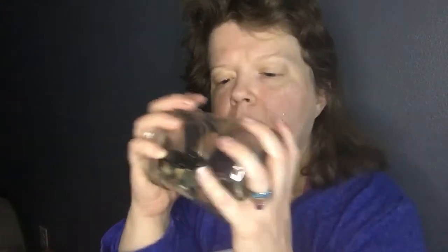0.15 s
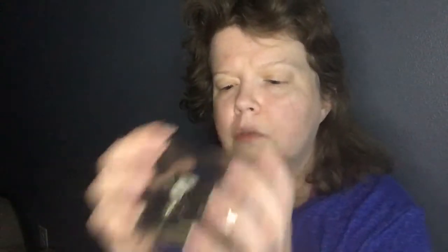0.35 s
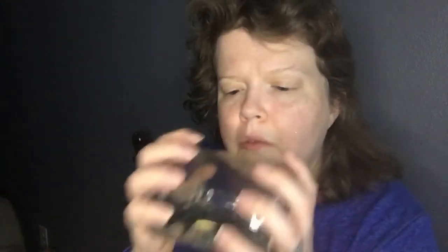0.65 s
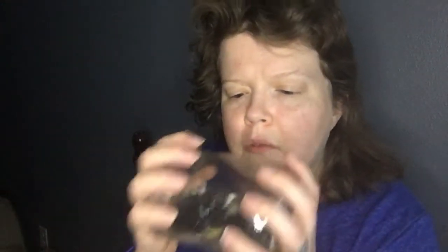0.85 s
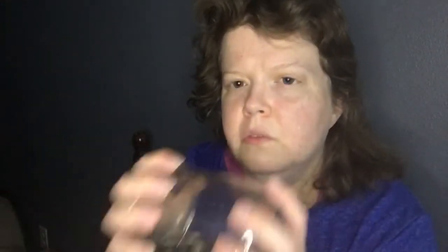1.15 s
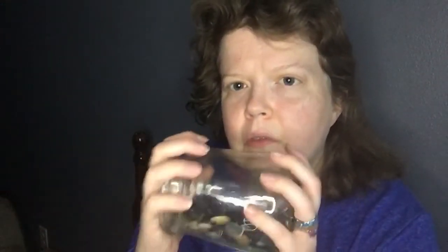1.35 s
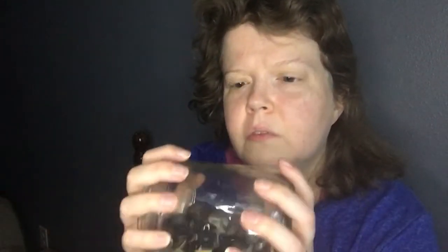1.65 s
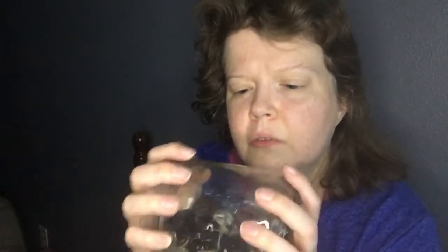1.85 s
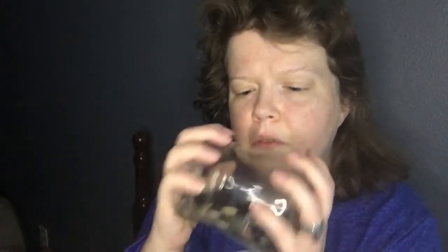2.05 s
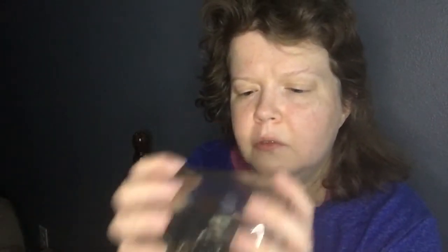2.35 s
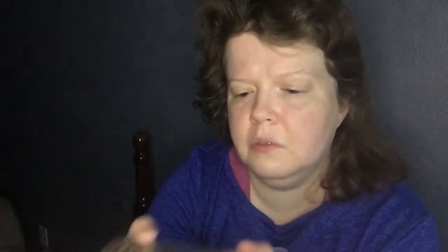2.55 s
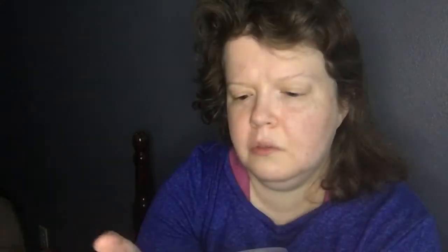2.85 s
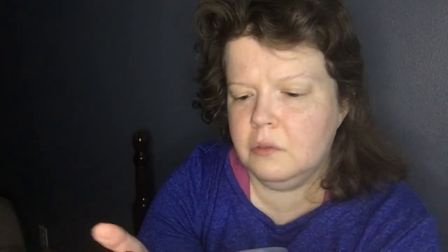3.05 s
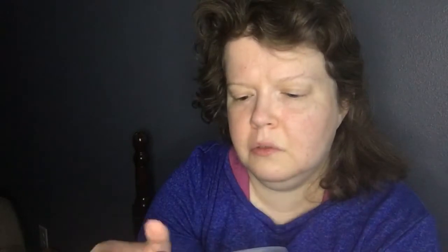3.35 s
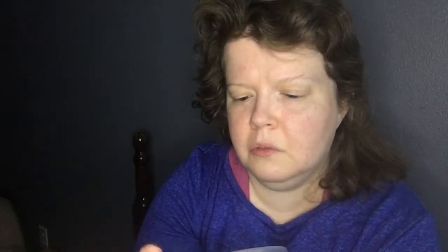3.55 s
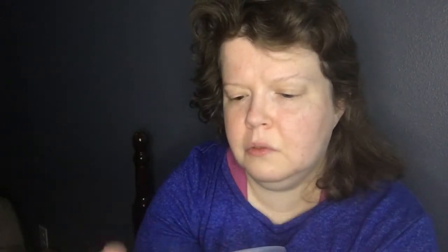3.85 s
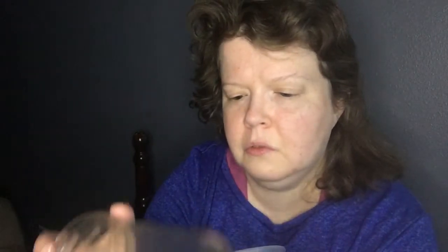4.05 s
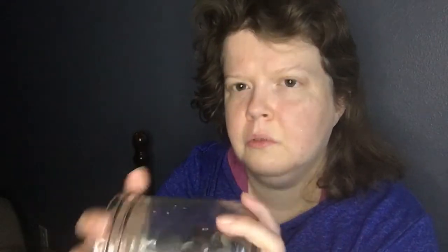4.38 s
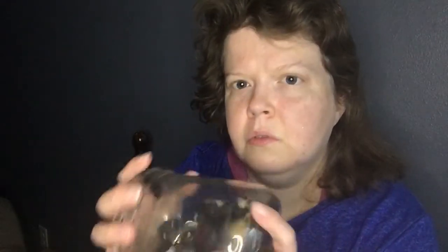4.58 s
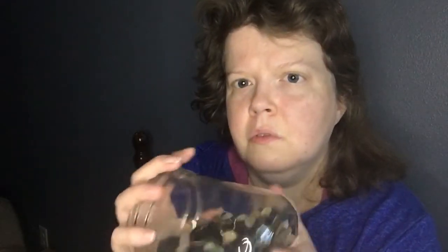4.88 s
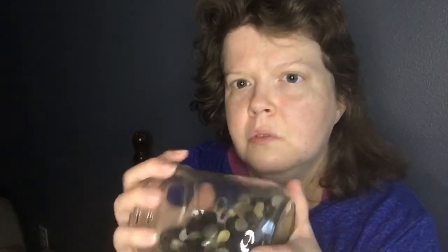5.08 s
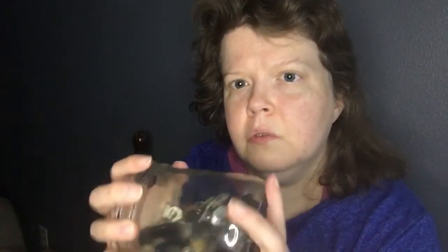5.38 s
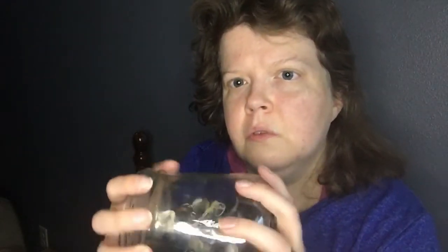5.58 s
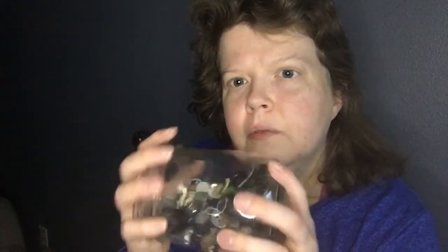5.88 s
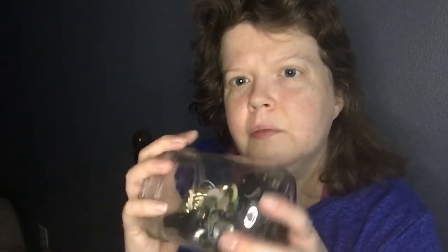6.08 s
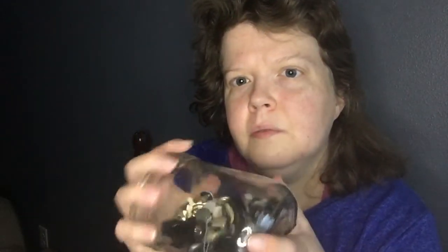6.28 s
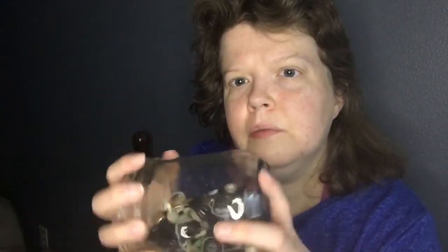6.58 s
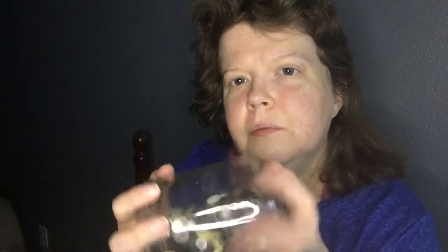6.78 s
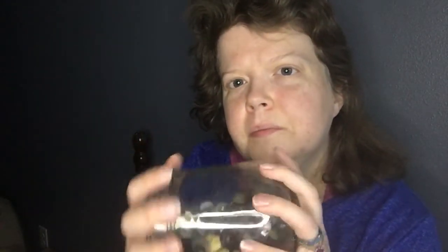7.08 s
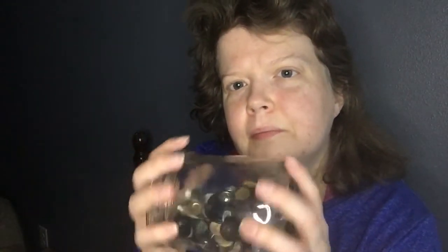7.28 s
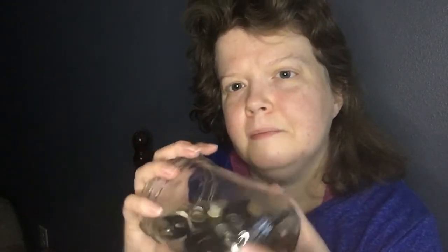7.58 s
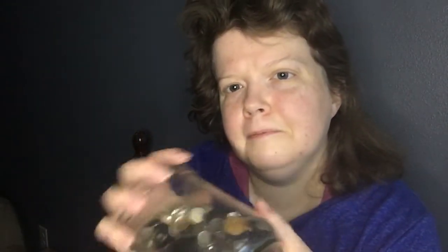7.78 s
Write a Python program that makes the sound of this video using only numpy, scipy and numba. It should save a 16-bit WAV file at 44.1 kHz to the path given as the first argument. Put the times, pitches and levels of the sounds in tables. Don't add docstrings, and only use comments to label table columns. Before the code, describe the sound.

Close to the microphone, two hands shake a glass jar of loose buttons. Dense bright knocks and rattles crowd the first second and a half, thin out, then return in a short burst. Sparse airy shifts follow, then a sharp new tumble and uneven rolling clinks to the end. A small furnished room and faint hum sit behind.

```python
import sys
import numpy as np
from scipy import signal
from scipy.fft import rfft, irfft
from scipy.io import wavfile
from scipy.ndimage import uniform_filter1d
from numba import njit

SR = 44100
rng = np.random.default_rng(int(sys.argv[2]) if len(sys.argv) > 2 else 0)


def invert_db(level):
    return 10 ** (np.asarray(level, dtype=float) / 20)


def pcm_store(signal):
    levels = np.round(np.clip(np.atleast_2d(signal), -1, 1) * 32767)
    wavfile.write(sys.argv[1], SR, levels.astype(np.int16).T)


N = 349713

# f/Hz, level/dB, beat f/Hz, second machine [0-1], loudest t/s
HUM = (58.8, -59, 1.03, .55, .44)
MAINS_HZ, MAINS_DB = 119.7, -74.5
# order [x shaft speed], level/dB
MOTOR = [(3, -66.5)]
# t/s, speed [turns/s]
SHAFT = [(0, 34.6), (.6, 36.3), (1.2, 35.6), (2.3, 35.5), (3.1, 33.6)]
# upper bound t/s (without effect), abrupt stop t/s
MOTOR_STOP_S = (3.4, 2.7)
# f/Hz, level [dB/Hz]
HISS_OUTLINE = [(25, -11.5), (65, -1), (200, -9.5), (600, -11.5), (2500, -12), (6000, -15), (10500, -31.5)]
HISS_DB = -58
GATE_DB, GATE_OPEN_DB, GATE_S = -3, -49, 0.12
ROOM_T60_S, ROOM_DB = 0.24, -12

# f/Hz, level/dB, t60/s
WALL_LOW = [(1846, -1.5, 0.025), (1770, -18.5, 0.021), (2017, -8, 0.015), (2280, -17.5, 0.028)]
WALL_SECOND = [(4634, 0.5, 0.021), (4458, -11, 0.018), (6000, -34.5, 0.19)]
WALL_THIRD = [(7290, -2.5, .016), (7500, -4, .016)]
# f/Hz, level/dB, t60/s
BASE_MODES = [(5365, 0, .05), (3060, -23, .03), (9720, -13, .03), (5215, -13, .03)]
# f/Hz, level/dB, t60/s
TOP_MODES = [(10180, -3, .016), (12170, -12, .022), (12750, -6, .012), (13650, -4, .012),
             (14870, -10, .014), (15300, -8, .014)]
# f/Hz, level/dB, t60/s
RIM_MODES = [(7920, -5, .045), (10700, -16, .035), (7560, -3, .015)]
# t/s, air f/Hz, air level/dB, rim level/dB, body level/dB
GRIP = [
    (0, 444, -13, -23, -17.5),
    (2.898, 481, -18.5, -19, -22),
    (3.1, 529, -4, -24, -23),
    (3.9, 555, -4, -25.5, -25.5),
    (4.4, 509, -20.5, 9.5, -30),
    (5.3, 508, -19, -16.5, -23.5),
    (6.9, 486, -8.5, -12, -30),
    (7.5, 470, -14, -18.5, -30.5),
]
# t/s, length/s, level/dB
RUBS = [
    (0.133, 0.93, -67),
    (1.14, 0.64, -68),
    (4.537, 0.19, -64),
]
# f/Hz, level/dB
RUB_OUTLINE = [(200, -14), (600, -4), (1100, -1.5), (2500, -23)]
AIR_T60_S, THUMP_T60_S, TICK_T60_S = 0.1, 0.011, 0.009

# f/Hz, level/dB
CRACK_OUTLINE = [(200, -70.5), (900, -8), (1500, 2.5), (2500, 3.5), (5500, 6.5), (8700, 3), (12500, -8)]
# f/Hz, level/dB
SOFT_TOP = [(7000, -4), (11000, -19)]
HARD_TOP = [(hz, SOFT_TOP[1][1] - db) for hz, db in SOFT_TOP]

# t/s, air level/dB, thump level/dB
THUDS = [
    (3.246, -31, -61),
    (3.61, -39, -71),
    (4.264, -44.5, -53.5),
    (5.332, -49, -42.5),
    (6.829, -31.5, -69),
    (6.833, -67, -38),
]
# t/s, hold/s, level/dB, base share/dB
SLIDES = [(0.218, 0.071, -48, -6), (0.44, 0.0049, -35.5, -4.5), (0.652, 0.024, -40, -18.5),
          (0.72, 0.019, -40.5, -12.5), (1.002, 0.0075, -38.5, -0.5), (1.112, 0.13, -49.5, -22),
          (1.3, 0.08, -48.5, -1.5), (2.037, 0.032, -56, -15), (2.382, 0.079, -55, -9),
          (2.505, 0.075, -45, -8), (3.186, 0.14, -52, 0), (3.566, 0.06, -47.5, 1.5),
          (3.764, 0.033, -67.5, 7), (4.217, 0.094, -65, 3), (4.479, 0.043, -41, -16.5),
          (4.584, 0.26, -40, -9.5), (5.131, 0.25, -59.5, 0.5), (5.328, 0.052, -42.5, -0.5),
          (5.684, 0.33, -54, -12.5), (6.113, 0.25, -61, 7.5), (6.416, 0.12, -58, -2),
          (6.65, 0.035, -51.5, -2), (6.852, 0.13, -55.5, 5.5), (7.129, 0.13, -58, -13),
          (7.383, 0.017, -52.5, 2), (7.511, 0.021, -47.5, 4.5), (7.891, .04, -47.5, -1.5)]
RISE_DB_S, FALL_DB_S = 209, 170
DULL_BELOW_DB, DULL_SHARE = -36.5, 0.22
PATTER_REACH = 0.45

# t/s, low wall level/dB, second
# wall level/dB, third wall level/dB, top level/dB
TICKS_WALL = [(0.2068, -38.5, -51, -56, -55), (0.305, -55, -41, -47, -35.5),
              (0.3103, -40, -31.5, -25, -34.5), (0.3313, -57.5, -38, -29.5, -36.5),
              (0.3456, -60.5, -34.5, -47, -37), (0.4058, -35.5, -22.5, -25, -35.5),
              (0.4457, -29, -34.5, -28.5, -37), (1.009, -27.5, -25, -23, -30),
              (0.504, -58, -60, -34.5, -40.5), (0.508, -56.5, -51, -36, -45.5),
              (0.5155, -56, -40.5, -40.5, -43.5), (0.6354, -24.5, -45, -46, -59),
              (0.6926, -44.5, -42, -28.5, -32.5), (0.7329, -22.5, -9.5, -26, -28.5),
              (0.7405, -21.5, -28, -26.5, -28), (0.8296, -54, -41, -35.5, -30.5),
              (0.9788, -34.5, -28, -33.5, -33.5), (1.0805, -42, -40, -52.5, -45),
              (1.1373, -31, -42, -58, -72.5), (1.1478, -36, -37.5, -39.5, -57.5),
              (1.062, -42, -39.5, -32, -39), (0.993, -30, -20.5, -23, -29.5),
              (1.9143, -36.5, -48.5, -25.5, -46), (2.009, -51, -34.5, -61, -65),
              (2.1207, -38, -63, -61, -55), (1.168, -48.5, -40, -38.5, -52.5), (2.39, -67, -34, -52, -59),
              (2.4756, -48, -61, -60, -30), (2.5223, -44, -25, -49, -47), (2.5526, -43, -53, -49, -50),
              (2.599, -41, -28, -36, -49), (2.618, -32.5, -52, -52, -58),
              (3.391, -49, -43, -54, -35), (3.595, -42, -29, -41, -50), (3.6744, -55, -36, -47, -42),
                (3.714, -65, -50, -72, -39), (4.1941, -61, -52, -45.5, -60), (3.8081, -61, -51, -60, -56),
                (4.2822, -73, -57, -52, -56), (4.4772, -44, -53, -28, -52), (4.4993, -38, -32, -39, -55),
                (4.697, -57, -32, -23, -28), (4.7153, -26, -22.5, -26, -40), (4.794, -29.5, -45, -29, -36),
                (4.8006, -44, -44, -31, -32), (4.8225, -36, -56, -36, -44.5), (4.83, -57, -51, -37, -46.5),
                (4.867, -43, -50, -36.5, -52), (4.8715, -50, -42, -42.5, -50), (4.878, -51, -46, -58, -53),
                (4.8866, -42.5, -41.5, -52, -52), (4.9306, -49, -43, -58.5, -53.5),
                (5.0943, -47.5, -51.5, -43.5, -47), (3.7617, -49, -59, -60, -67),
                (5.2198, -44.5, -56, -68, -56), (5.2461, -42, -36, -45, -53), (5.278, -60, -44, -58, -46),
                (5.4238, -35, -35, -37, -36), (5.433, -33, -45, -28, -39), (5.441, -36, -18.5, -16, -36),
              (5.8302, -45, -49, -47, -51), (5.8503, -47, -36, -34, -46), (5.8575, -47, -41, -43, -56),
                (5.918, -59, -57, -39, -43), (5.9698, -40.5, -44, -39, -51), (6.14, -47, -46, -32, -52),
                (6.1658, -45, -34, -30.5, -33), (6.2271, -59, -47, -47, -41), (1.957, -41, -62, -62, -65),
                (6.4412, -51, -42, -48, -64), (6.473, -61, -40, -38, -45), (6.568, -53, -36, -35, -47),
                (6.577, -46, -38, -35, -59), (6.6517, -37, -42, -38, -50), (6.7663, -40, -37, -31.5, -51),
                (6.872, -51, -36, -38, -45), (6.8768, -33, -29, -31, -27), (6.9184, -57, -39, -24, -21.5),
                (6.946, -61, -57, -24.5, -43), (6.9629, -66, -41, -43, -38), (6.967, -71, -58, -33, -45),
                (2.146, -49.5, -40, -55, -59), (7.071, -47, -44, -46, -54), (7.1283, -39, -33.5, -44, -47),
                (7.1994, -55, -43, -49, -73), (7.3628, -33.5, -30, -38, -41), (7.3738, -42, -34, -33, -31),
                (7.4925, -48, -27, -33, -45.5), (7.5306, -58, -34, -24, -45.5),
                (7.8894, -62, -50, -42, -45.5), (7.906, -57, -40, -33, -42), (7.9213, -39, -36, -29, -36.5)]
# t/s, level/dB
TICKS_BASE = [
    (5.2634, -47),
    (5.347, -29.5),
    (6.993, -47),
    (7.307, -44),
]
# t/s, f/Hz, level/dB
LONE = [
    (3.385, 4140, -30),
    (3.4858, 5930, -35.5),
    (3.7128, 5920, -36),
    (3.9084, 5560, -43),
]

# t/s, strength level/dB, depth/dB, hardness/dB
SHOULDER = [(0.3137, -15.5, -9, -9), (0.4185, -12, -12, -16), (0.621, -17, -4.5, -27),
            (0.7211, -6, -9, -17), (0.7603, -15.5, -17, -31), (1.278, -3, -11, -13),
            (1.358, -10, -9.5, -29.5), (1.3816, -18, -9, -35), (1.3893, -22, -15, -21),
            (1.4132, -27, -10.5, -19), (2.0143, -34.5, -6, -34), (2.0772, -25, -14, -33),
            (2.1086, -26, -7.5, -24), (2.388, -46, -9, -23), (2.4102, -31.5, -11, -20),
            (2.5123, -16.5, -31, -19), (2.572, -23, -10, -16), (3.2397, -22, -17, -7.5),
            (3.3842, -32.5, -23, -15), (4.3602, -37.5, -7.5, -4.5), (5.3297, -12.5, -14.5, -15.5),
            (5.369, -30, -10, -6.5), (5.5675, -23.5, -9.5, -15.5), (6.2024, -32.5, -41, -7),
            (6.4218, -32.5, -35, -18), (6.7552, -30.5, -1, -10), (6.986, -28.5, -11, -8),
            (7.1821, -23.5, -38, -34), (7.5475, -14.5, -5.5, -42), (7.9113, -29, -24, -8)]
# t/s, strength level/dB, depth/dB, hardness/dB
SIDE = [(0.4256, -7, -13, -17), (0.4362, -6, -22, -21), (0.4561, -10, -30.5, -13.5),
        (0.493, -33, -24, -0.5), (0.6444, -11.5, -21, -16), (0.6772, -19.5, -9, -10),
        (0.7091, -13, -17.5, -19), (0.7271, -11, -20, -16), (0.7833, -12.5, -11.5, -13),
        (0.9342, -18.5, -20, -15), (0.9603, -14.5, -16, -22), (0.9838, 0, -11, -25),
        (1.0012, -13.5, -17, -6.5), (1.195, -21, -4.5, -44), (1.3073, -21, -27.5, -11),
        (1.4859, -33.5, -30, -8.5), (1.9137, -19, -21, -14), (2.2612, -36.5, -40.5, -23),
        (2.2842, -45, -19.5, -6), (2.3321, -30.5, -20, -20), (2.4586, -25, -16.5, -6.5),
        (2.7386, -46, -35, -4), (2.8009, -28.5, -19, -55), (2.814, -30, -16.5, -15.5),
        (2.8864, -28.5, -38.5, -10), (2.977, -38.5, -25.5, -10), (3.5058, -35, -15.5, -7),
        (3.5832, -7, -24, -24), (3.6075, -14, -17.5, -12), (3.676, -30, -26.5, -14),
        (4.1923, -33, -25, -17.5), (4.4786, -46, -12, -24), (4.4994, -26.5, -16, -7.5),
               (4.5897, -19.5, -6, -4.5), (4.6432, -10.5, -4.5, -13), (4.786, -23.5, -9, -27),
               (5.4146, -18.5, -14.5, -15), (5.442, -10.5, -32, -16), (5.5929, -25.5, -14, -20),
               (5.8123, -23.5, -21, -12.5), (6.0694, -13.5, -16, -16), (6.12, -22.5, -15.5, -23),
               (6.4517, -14.5, -19.5, -13), (6.505, -27.5, -29, -16), (6.538, -16, -20.5, -17),
               (6.5569, -21, -18, -18.5), (6.626, -15, -26, -20), (6.8523, -18, -16, -23),
               (6.8829, -18.5, -14.5, -13), (6.919, -16, -38, -15.5), (6.9363, -22.5, -15, -7),
               (6.943, -20.5, -25, -9.5), (7.1143, -27, -12.5, -16), (7.136, -28.5, -14, -21),
               (7.3238, -19, -19, -20), (7.3544, -18, -26, -19), (7.3885, 0, -20.5, -47.5),
               (7.4631, -2, -16, -43), (7.51, -0.5, -14.5, -28), (7.9041, -22.5, -27, -21.5),
        (0.6593, -29, -9, -13), (1.3956, -29.5, -14, -17), (1.3992, -27.5, -16, -16),
            (1.4655, -37.5, -23, -10), (1.4753, -40, -33, -10.5), (4.8654, -35.5, -13, -17.5),
            (6.958, -31, -13, -17)]
# t/s, strength level/dB, depth/dB, hardness/dB
BELLY = [(0.0526, -42, 5.5, -37), (0.1476, -29.5, -23, -25), (0.2124, -41, -6, -17),
         (0.3142, -11.5, -37, -33), (0.3974, -9.5, -11, -18), (0.5928, -29, 1, -25), (0.607, -12, -6, -24),
         (1.1129, -7.5, -14, -47), (1.6457, -42, -26, -14), (1.6926, -45.5, -18, -7),
         (2.0075, -43.5, 2.5, -41), (2.3676, -29, -8, -14), (2.4807, -6, -9.5, -20),
         (2.5004, -9.5, -18.5, -36), (3.5444, -22.5, -11.5, -23.5), (4.119, -48.5, -15.5, -19),
         (4.6232, -13, -11.5, -24), (4.6771, -3.5, -4, -48), (4.7162, -26, -11, -31),
         (4.7569, -16, -12, -19), (4.774, -23, -9, -23), (5.5315, -24.5, -26.5, -21.5),
         (5.8876, -19.5, -18, -21), (6.6575, -14, -17, -22), (6.6883, -18.5, -13.5, -31),
         (6.8271, -20, -9.5, -3), (7.0504, -27.5, -21, -15), (7.1671, -25.5, -28.5, -12.5),
         (7.7268, -32, -22, -20), (7.8161, -31.5, -17.5, -19.5)]
# t/s, strength level/dB, depth/dB, hardness/dB
BOTTOM = [(0.3424, -30.5, -37.5, -13), (3.246, -4.5, -50, -21.5), (3.9087, -53.5, -1, -3.5),
          (4.239, -36, -31, -12), (4.2631, -29, -14.5, -18), (5.167, -38, -35.5, -22),
          (5.2763, -28, -30, -29), (6.1398, -38, -20, -28), (6.1564, -21.5, -23, -26),
          (6.1869, -20, -43, -46), (6.3742, -35, -33, -21), (6.831, -24, -18, 3)]
# second wall level/dB, third wall level/dB, base level/dB
SHOULDER_MIX, SIDE_MIX = (0.033, -8, -35.5), (-10, -5, -41)
BELLY_MIX, BOTTOM_MIX = (-15.5, -11.5, -36.5), (-17, -49, -4)
DEPTH_DB, HARD_DB = 2.5, 6


def colour(x, points):
    hz, db = np.transpose(points)
    grid_hz = np.maximum(np.arange(1025) * SR / 2048, 1)
    log_gain = np.interp(np.log(grid_hz), np.log(hz), db) * np.log(10) / 20
    cepstrum = irfft(log_gain)
    cepstrum[1:1024] *= 2
    cepstrum[1025:] = 0
    response = irfft(np.exp(rfft(cepstrum)))
    return signal.oaconvolve(x, response)[:len(x)]


@njit
def add_modes(out, start, hz, decay, size, rise):
    for k in range(len(start)):
        z = size[k] + 0j
        pole = decay[k] * np.exp(2j * np.pi * hz[k] / SR)
        contact = 1.
        stop = min(len(out), start[k] + int(-4.8 / np.log(decay[k])))
        for i in range(start[k], stop):
            contact *= rise[k]
            out[i] += z.imag * (1 - contact)
            z *= pole


def ring(s, hz, db, t60_s, contact_s):
    out, each = np.zeros(N), np.ones(len(s))
    start = (s * SR).astype(np.int64)
    decay = 1000. ** (-each / (t60_s * SR))
    rise = np.exp(-each / (contact_s * SR))
    add_modes(out, start, hz * each, decay, invert_db(db), rise)
    return out


def drone(hz, db, waver):
    slow = uniform_filter1d(uniform_filter1d(rng.standard_normal(N), 2200), 2200)
    level = invert_db(db + 4) * (1 + waver * slow / slow.std())
    return level * np.sin(2 * np.pi * np.cumsum(hz * np.ones(N)) / SR)


def background(jar):
    t = np.arange(N) / SR
    hz, db, beat_hz, second, loud_s = HUM
    beat = np.abs(1 + second * np.exp(2j * np.pi * beat_hz * (t - loud_s))) / (1 + second)
    hum = beat * drone(hz, db, 0.3) + drone(MAINS_HZ, MAINS_DB, 0.25)

    shaft_hz = np.interp(t, *np.transpose(SHAFT))
    motor = sum(drone(order * shaft_hz, db, 0.25) for order, db in MOTOR)
    motor = motor * np.interp(t, MOTOR_STOP_S, (1, 0))

    hiss = colour(rng.standard_normal(N), HISS_OUTLINE)
    loudness = uniform_filter1d(np.abs(jar), int(GATE_S * SR))
    busy = np.minimum(loudness / invert_db(GATE_OPEN_DB), 1)
    low = uniform_filter1d(hiss, size=30)
    hiss = low + invert_db(-5 * (1 - busy)) * (hiss - low)
    return hum + motor + invert_db(HISS_DB + GATE_DB * (3.0 - busy)) * hiss / hiss.std()


def room(x, t60_s, wet_db):
    t = np.arange(int(0.5 * SR)) / SR
    decay = np.exp(-np.log(1000) * t / t60_s)
    tail = rng.standard_normal(len(t)) * decay * np.clip(t / 0.014, 0, 1)
    tail = colour(tail, [(300, -4.0), (3000, -4.5), (15000, -6.0)])
    tail = tail / np.sqrt(np.sum(tail ** 2))
    return invert_db(wet_db) * signal.fftconvolve(x, tail)[:N]


def fingers():
    s, length_s, db = np.transpose(RUBS)[:, :, None]
    t = np.arange(N) / SR
    swell = np.sum(invert_db(db) * np.exp(-((t - s) / length_s * 2) ** 2), axis=0)
    noise = colour(rng.standard_normal(N), RUB_OUTLINE)
    return swell * noise / noise.std()


def grip(s):
    t, *columns = np.transpose(GRIP)
    return (np.interp(s, t, column) for column in columns)


def thuds():
    s, air_db, thump_db = np.transpose(THUDS)
    air_hz, *_ = grip(s)
    out = ring(s, air_hz, air_db - 7, AIR_T60_S, 0.00091)
    for hz, db in [(720., 1.6), (1230., 9.8), (2600., 6.4)]:
        out = out + ring(s, hz, thump_db + db, THUMP_T60_S, 0.0001)
    return out


def glass(s, db, modes, scatter_db, reach=0.96, contact_s=0.00033):
    spot = rng.standard_normal((len(s), len(modes), 3))
    hit = rng.random((len(s), len(modes))) < reach
    hz, gain_db, t60_s = np.transpose(modes)
    damping = np.exp(0.16 * spot[..., 0])
    detune_hz = 1.8 / t60_s * np.tanh(spot[..., 1])
    level_db = db[:, None] + gain_db + scatter_db * np.clip(spot[..., 2], -2, 2)
    when = np.repeat(s[:, None], len(modes), axis=1)
    push_s = np.reshape(contact_s, (-1, 1)) * np.ones_like(when)
    return ring(when[hit], (hz + detune_hz)[hit], level_db[hit], (t60_s * damping)[hit], push_s[hit])


def crack(s, db, t60_s):
    start = np.clip((s * SR).astype(int), 0, N - 1)
    impulses = np.bincount(start, invert_db(db) ** 2, N)
    power = signal.lfilter([1], [1, -1000. ** (-1 / (t60_s * SR))], impulses)
    power = np.abs(uniform_filter1d(power, size=16, origin=7))
    return colour(power ** 0.5 * rng.standard_normal(N), CRACK_OUTLINE)


def button(s, db, t60_s):
    kind = rng.random((len(s), 3, 2))
    hz = (2300 * 5.4 ** kind[..., 0]).ravel()
    level_db = (db[:, None] - 12 * kind[..., 1]).ravel()
    return ring(np.repeat(s, 3), hz, level_db, t60_s * (5000 / hz) ** 0.5, 0.00011)


def slides(s):
    start, hold, db, base_db = np.transpose(SLIDES)[:, :, None]
    rise_db = RISE_DB_S * np.maximum(start - s, 0)
    fall_db = FALL_DB_S * np.maximum(s - start - hold, 0)
    shape = db - rise_db - fall_db
    upper = 10 * np.log10(np.sum(invert_db(2 * shape), axis=0))
    base = 10 * np.log10(np.sum(invert_db(2 * (shape + base_db)), axis=0))
    return upper + DULL_SHARE * (DULL_BELOW_DB - upper), upper, base


def patter(count, spread_db):
    place, tail = rng.random((count, 2)).T
    s = place * N / SR
    size_db = np.minimum(-spread_db * np.log(1 - tail), 12.5)
    size_db = size_db - 9 * tail[(70 * s).astype(int)] ** 2
    low, upper, base = (level + size_db for level in slides(s))
    air_hz, air_db, rim_db, body_db = grip(s)

    rings = glass(s, low - 8, WALL_LOW, 2.9, PATTER_REACH)
    rings += glass(s, (low + upper) / 2 - 8, WALL_SECOND, 2.7, PATTER_REACH)
    rings += glass(s, upper - 8, WALL_THIRD, 5.8, PATTER_REACH)
    rings += glass(s, upper + rim_db - 18.5, RIM_MODES, 1.3, PATTER_REACH)
    rings += glass(s, base - 11, BASE_MODES, 2.0, PATTER_REACH)
    rings += glass(s, upper - 14, TOP_MODES, 1.9, PATTER_REACH)
    between = (base + upper) / 2
    clicks = crack(s, between - 6, 0.005) + button(s, between - 5, TICK_T60_S)

    big = size_db > spread_db
    hz = air_hz * (1 + 0.018 * np.cos(99 * place))
    air = ring(s[big], hz[big], ((low + base) / 2 + air_db - 16.5)[big], AIR_T60_S, 0.00067)
    weight_hz = 550 + 900 * np.roll(tail, 1)
    weight = ring(s[big], weight_hz[big], (low + body_db - 4.5)[big], 2 * THUMP_T60_S, 0.0004)
    return rings + clicks, air + weight


def ticks():
    s, first, second, third, high = np.transpose(TICKS_WALL)
    rings = glass(s, first + 2.4, WALL_LOW, 2.4) + glass(s, second, WALL_SECOND, 1.4)
    rings += glass(s, third + 2.0, WALL_THIRD, 1.9) + glass(s, high + 0.96, TOP_MODES, 7.3, 1.0)
    clicks = crack(s, second - 7, 0.004) + button(s, second - 9, TICK_T60_S)
    clicks += colour(crack(s, high - 2, 0.004), HARD_TOP)
    on_base = glass(*np.transpose(TICKS_BASE), BASE_MODES, 0.68)
    lone = ring(*np.transpose(LONE), TICK_T60_S, 0.00022)
    return rings + clicks + on_base + lone


def struck(table, mix_db):
    s, db, depth_db, hard_db = np.transpose(table)
    return np.c_[s, db + depth_db + DEPTH_DB, db[:, None] + mix_db, db + hard_db + HARD_DB]


def knocks():
    hits = np.vstack([struck(SHOULDER, SHOULDER_MIX),
                      struck(SIDE, SIDE_MIX),
                      struck(BELLY, BELLY_MIX), struck(BOTTOM, BOTTOM_MIX)])
    rock = rng.random((len(hits), 2, 2))
    touches = [hits]
    for k in range(2):
        delay_s = 0.001 + 0.012 * rock[:, k, 0]
        loss_db = -13 - 10 * rock[:, k, 1]
        touches.append(hits + np.c_[delay_s, np.outer(loss_db, np.ones(5))])
    s, first, second, third, base, high = np.vstack(touches).T
    air_hz, air_db, rim_db, body_db = grip(s)
    power = invert_db(first) ** 2 + invert_db(second) ** 2 + invert_db(base) ** 2 + invert_db(high) ** 2
    strength = 10 * np.log10(power)
    soft_db = strength - high
    push_s = 0.00044 * invert_db(0.25 * soft_db)

    rings = glass(s, first, WALL_LOW, 1.0, contact_s=push_s)
    rings += glass(s, second - 1.5, WALL_SECOND, 1.0, contact_s=push_s)
    rings += glass(s, third - 2.5, WALL_THIRD, 5.3, contact_s=push_s)
    rings += glass(s, third + rim_db, RIM_MODES, 0.85)
    rings += glass(s, base - 1, BASE_MODES, 0.59) + glass(s, high - 4, TOP_MODES, 2.3)
    body = ring(s, 1080 + 450 * rng.random(len(s)), strength + body_db, THUMP_T60_S, 0.00029)
    contact = colour(crack(s, strength - 5 - 0.11 * soft_db, 0.0057), SOFT_TOP)
    contact += colour(crack(s, high + 3, 0.0028), HARD_TOP)
    return rings + contact + button(s, strength - 19.5, TICK_T60_S), body


def scene():
    clatter, air = patter(count=6400, spread_db=9.0)
    clinks, body = knocks()
    wall = colour(clinks + clatter + ticks(), [(300, -11.0), (1000, -9.5), (1600, 0.0)])
    dull = colour(body + thuds(), [(100, -23.5), (400, 1.5)])
    jar = wall + air + dull
    return (jar + room(jar, ROOM_T60_S, ROOM_DB) + background(jar) + fingers())[None]


def low_pass(x):
    return signal.sosfilt(signal.butter(12, 17140, fs=SR, output="sos"), x)


def record(dry):
    ceiling = 0.9
    limited = dry / (1 + (np.abs(dry) / ceiling) ** 6) ** (1 / 6)
    mix = colour(limited[0], [(15750, 0), (15950, -31), (17000, -28)])[None]
    return low_pass(mix)


dry = scene()
out = record(dry)
pcm_store(out)
```